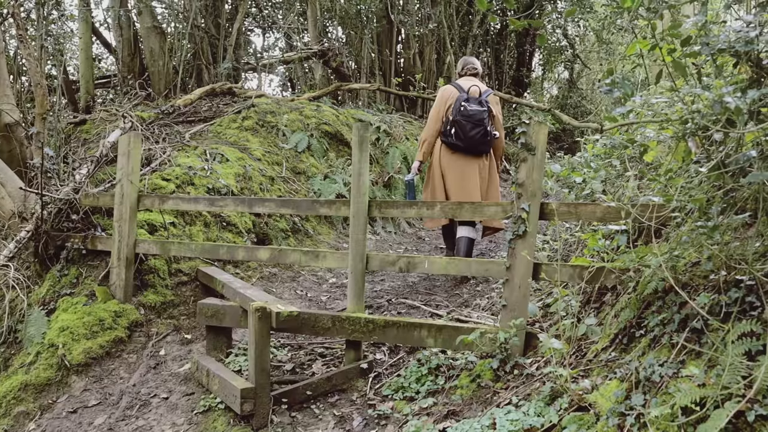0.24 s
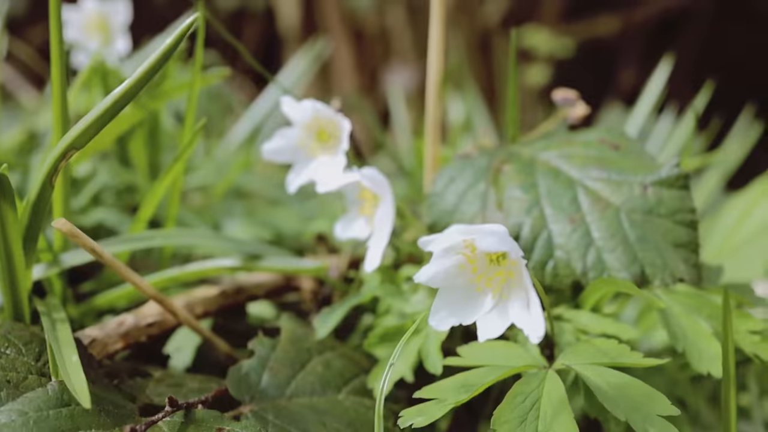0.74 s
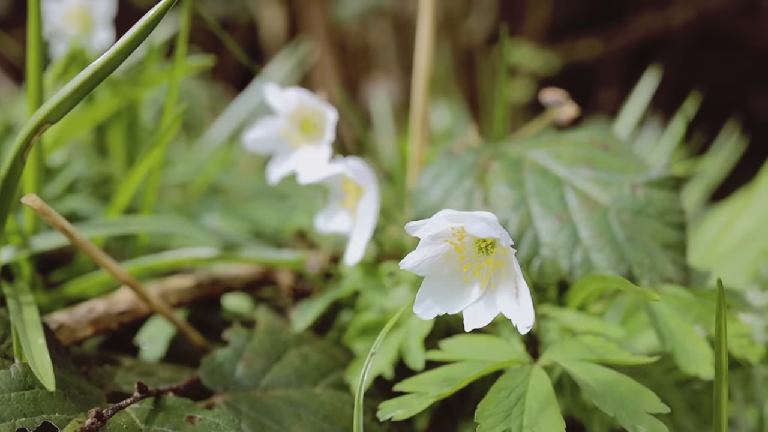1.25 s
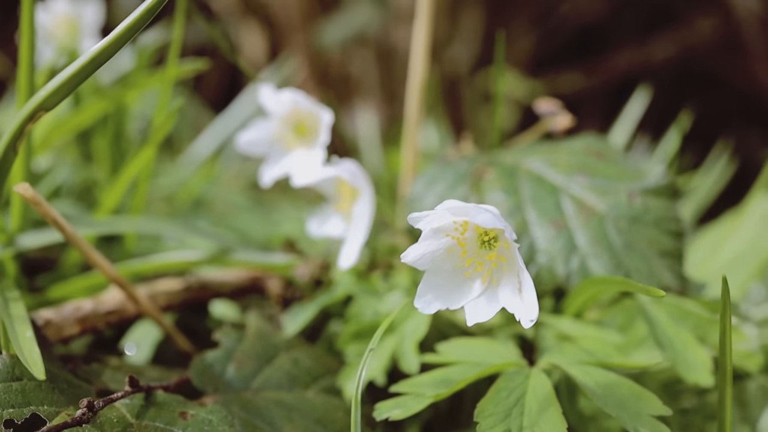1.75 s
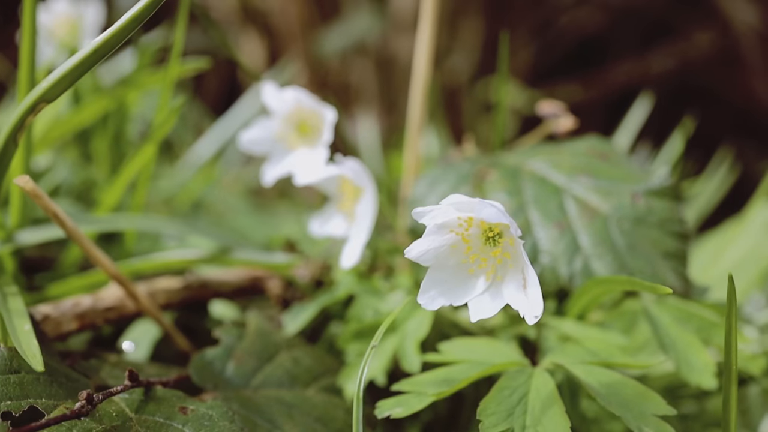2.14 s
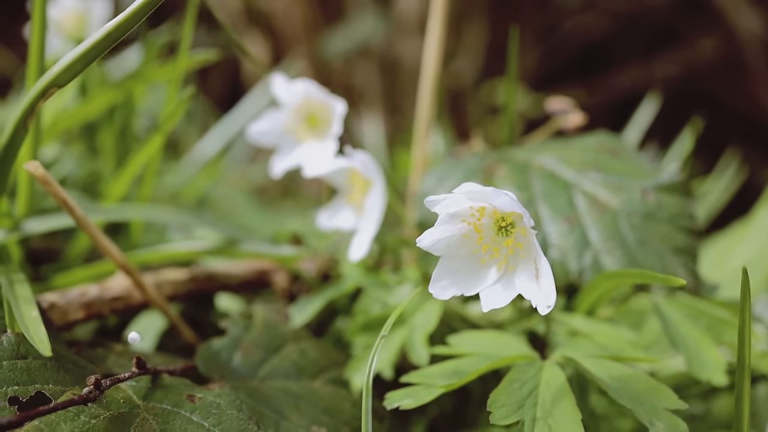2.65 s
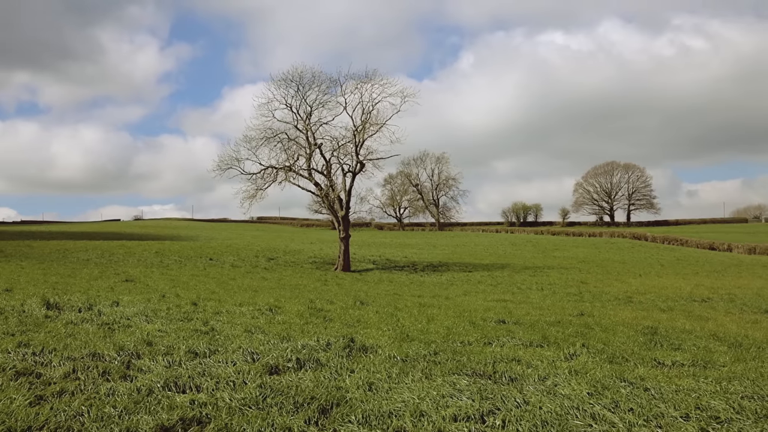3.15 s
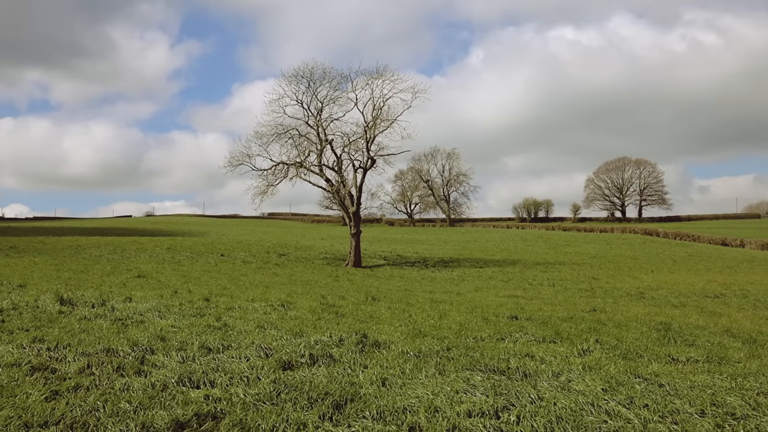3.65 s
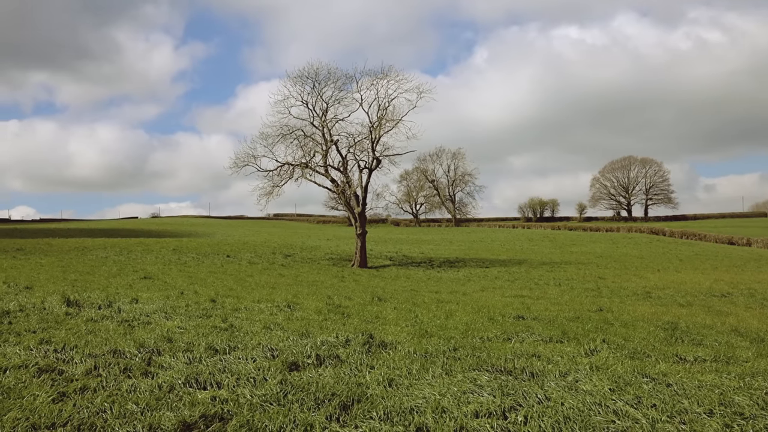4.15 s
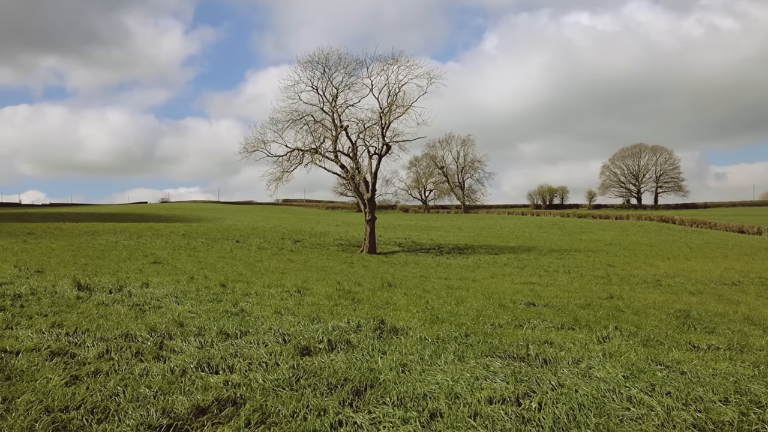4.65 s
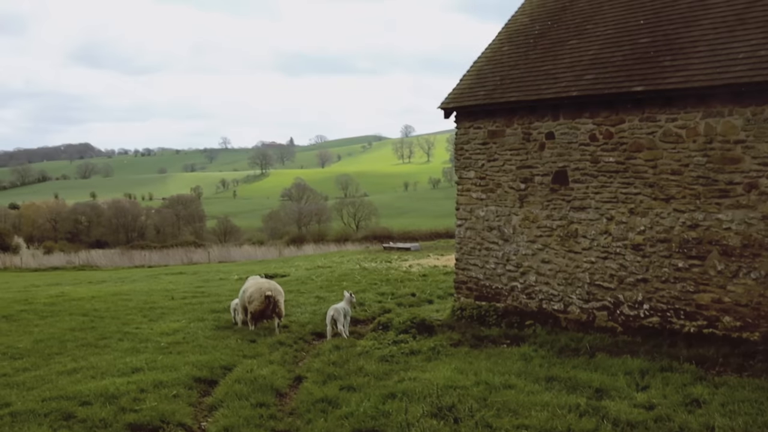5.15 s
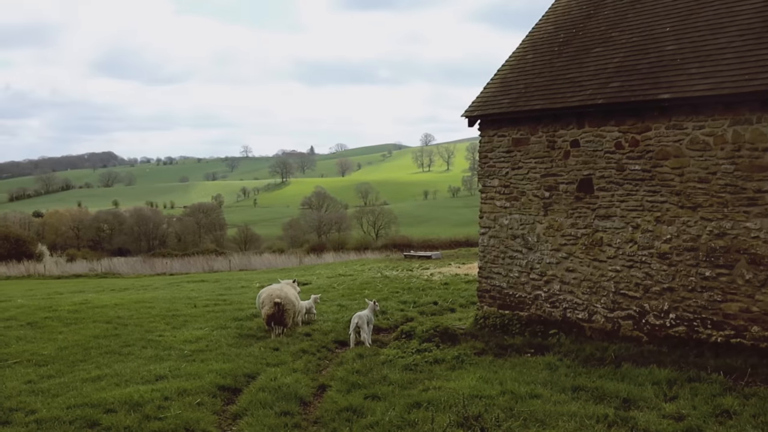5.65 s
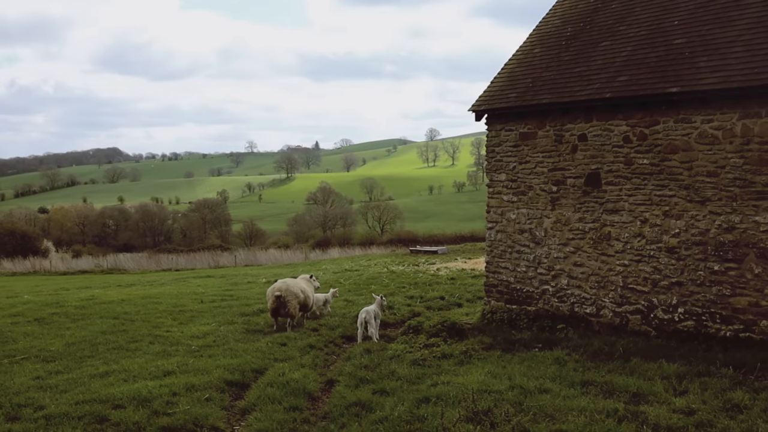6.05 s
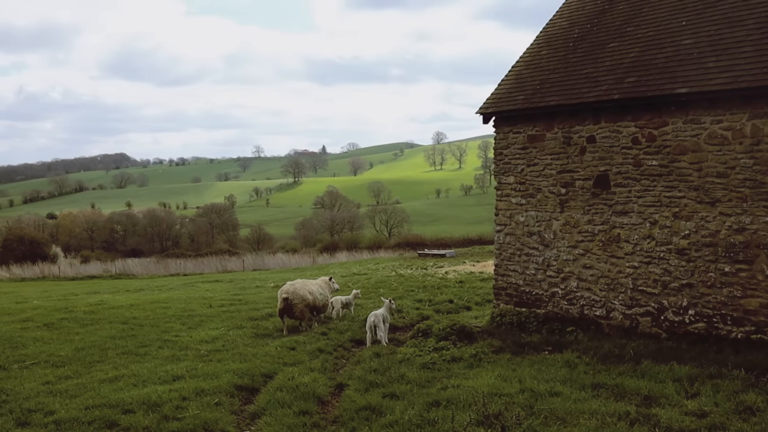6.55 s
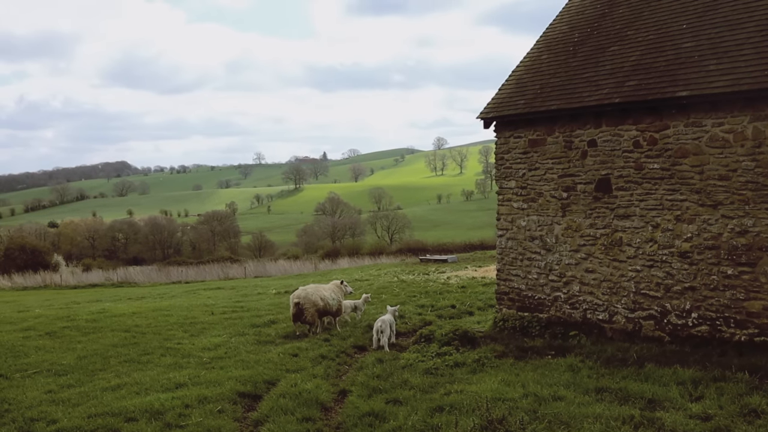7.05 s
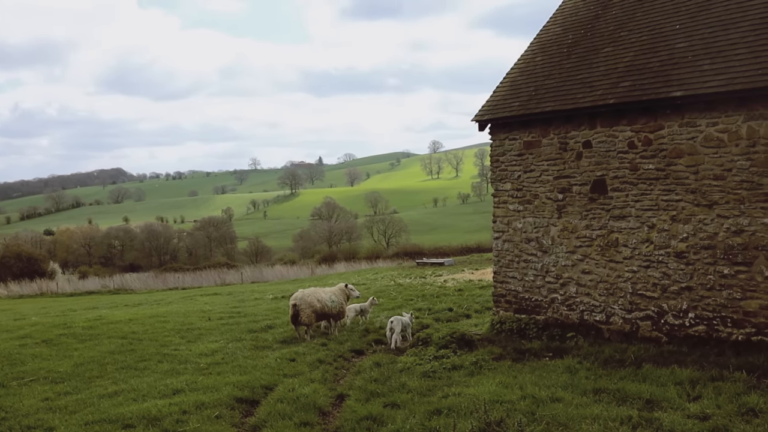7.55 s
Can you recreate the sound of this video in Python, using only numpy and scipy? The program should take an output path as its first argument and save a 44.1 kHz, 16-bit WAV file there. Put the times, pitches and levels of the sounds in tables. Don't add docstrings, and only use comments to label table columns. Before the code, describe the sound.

A wren sings thin, bright notes and a quick repeating trill over gritty footsteps and twig snaps in a reverberant wood. It cuts to a bubbling brook with sharp drop ticks and a short finch wheeze, then to wind rubbing grass in an open field. Finally a lamb bleats shakily, a ewe grumbles low, faint birds chirp, hooves thud, and a second lamb bleats until the end. Low wind thuds on the microphone throughout.

```python
import sys
import numpy as np
from scipy import signal
from scipy.io import wavfile
from scipy.ndimage import uniform_filter1d

SR = 44100
rng = np.random.default_rng(int(sys.argv[2]) if len(sys.argv) > 2 else 0)


def gain_from_db(level_db):
    decades = np.asarray(level_db, float) / 20
    return 10 ** decades


def bounce(signal):
    frames = np.transpose(np.atleast_2d(signal))
    limited = np.clip(frames, -1, 1)
    pcm = np.round(limited * 32767).astype(np.int16)
    wavfile.write(sys.argv[1], SR, pcm)


N = 344421


def evened(x):
    return x / np.sqrt(np.mean(x ** 2) + 1e-20)


def curve(rows, t):
    s, *columns = np.transpose(rows)
    return [np.interp(t, s, c) for c in columns]


def add(mix, s, sound):
    part = mix[round(s * SR):][:len(sound)]
    part += sound[:len(part)]


def resonate(x, hz, width):
    turn = np.exp(2j * np.pi * np.cumsum(hz * np.ones(len(x))) / SR)
    r = np.exp(-np.pi * width / SR)
    return 2 * (turn * signal.lfilter([(1 - r) ** 2], [1, -2 * r, r * r], x / turn)).real


def colour(x, points, patchy_db=0.):
    hz, _, z = signal.stft(x, SR, nperseg=512, noverlap=384)
    blotches = uniform_filter1d(rng.standard_normal(z.shape), size=5, axis=0)
    blotches = evened(uniform_filter1d(blotches, size=16, axis=1))
    f, db = np.transpose(points)
    spectrum_db = np.interp(np.log(hz + 1), np.log(f + 1), db)[:, None]
    z = z * gain_from_db(spectrum_db + patchy_db * blotches)
    return evened(signal.istft(z, SR, nperseg=512, noverlap=384)[1][:len(x)])


def grains(count, per_s, spread_db):
    sizes = gain_from_db(spread_db * np.minimum(rng.exponential(1, count), 4)) * rng.standard_normal(count)
    return evened(sizes * (rng.random(count) < per_s / SR))


def echoes(x, t60, wet_db, gap):
    t = np.arange(SR // 2) / SR
    hits = rng.standard_normal(len(t)) * (rng.random(len(t)) < 2000 / SR)
    tail = hits * gain_from_db(-60 * t / t60) * (t > gap)
    return x + gain_from_db(wet_db) * signal.oaconvolve(x, tail / np.linalg.norm(tail))[:len(x)]


def rings(events, cycles, glide):
    out = np.zeros(N)
    for s, db, hz in events:
        turns = np.arange(int(5 * cycles * SR / hz)) * hz / SR
        tone = np.sin(2 * np.pi * turns * (1 + glide * turns / cycles))
        add(out, s, gain_from_db(db) * tone * np.exp(-turns / cycles) * np.minimum(turns, 1))
    return out


def whistles(notes):
    out = np.zeros(N)
    for start, end, first, middle, last, db in notes:
        u = np.linspace(-1, 1, int((end - start) * SR))
        hz = middle + (last - first) / 2 * u + ((first + last) / 2 - middle) * u ** 2
        swell = np.sqrt(2) * (1 - u ** 2) ** 0.87
        add(out, start, gain_from_db(db) * np.sin(2 * np.pi * np.cumsum(hz) / SR) * swell)
    return out


# pitch_hz, density_db
AIRS = [
    [(71, -39), (120, -2), (922, -8.5), (2890, -15.5), (4090, -8), (4530, -12.5), (5440, -8.5), (6800, -20),
     (15700, -25.5)],
    [(71, -40), (120, -20), (192, 2), (589, -5), (652, -7), (867, -3), (1230, -3.5), (1740, -2), (5440, -9),
     (14200, -23.5), (15700, -24)],
    [(71, -11), (120, 3.5), (260, 0), (368, -5.5), (652, -4.5), (1230, -7), (1540, -8), (2130, -14),
     (2720, -14), (15700, -37.5)],
    [(71, -14), (120, -0.5), (245, -8), (425, -14.5), (532, -19), (722, -16), (800, -18.5), (1180, -19),
     (4710, -26), (15700, -33)],
]
# hiss level_db in a mean wind, blotchiness_db, drift_db_per_s
AIR_LEVEL_DB = [-48.5, -46.5, -50, -53]
PATCHY_DB = [1.1, 1.8, 0.94, 1.5]
AIR_DRIFT = [4, -0.1, -0.5, -1.1]
# time_s, level_db
WIND = [(0, -53), (.54, -54.5), (.6, -39.5), (1.78, -45), (2.15, -41), (2.68, -50), (2.8, -37),
        (3.2, -42.5), (3.31, -36), (4.18, -41.5), (4.3, -31.5), (4.62, -41), (4.76, -29.5), (4.97, -31),
        (5.02, -49), (5.33, -36), (5.48, -42), (7.81, -46)]
MEAN_WIND_DB = -44
# quick buffeting level_db in a mean wind, then rise of buffeting and of hiss in db_per_db of wind
BUFFET_DB = [-58, -58.5, -50.5, -62]
BUFFET_FOLLOWS = [.05, 0.077, 0.2, .05]
AIR_FOLLOWS = [0.041, 0.011, .05, 0.3]
# centre_s, width_s, hiss_db, buffet_db
SWELLS = [
    (1.62, 0.35, -2, 3.5),
    (3.35, 0.22, 4, -2),
    (4.53, 0.325, 4.5, 4),
    (4.95, 0.15, 1, 12),
]


def air(place, t):
    push_db = curve(WIND, t)[0]
    above_db = push_db - MEAN_WIND_DB
    heave = evened(resonate(rng.standard_normal(len(t)), 25.9, 13.2))
    buffet = evened(resonate(rng.standard_normal(len(t)), 77.0, 58))
    hiss = colour(rng.standard_normal(len(t)), AIRS[place], PATCHY_DB[place])
    slow_db = uniform_filter1d(above_db, size=9000)
    hiss_db = AIR_LEVEL_DB[place] + AIR_FOLLOWS[place] * slow_db + AIR_DRIFT[place] * (t - t.mean())
    swell_db, blast_db = sum(np.outer(dbs, np.exp(-((t - s) / width) ** 2)) for s, width, *dbs in SWELLS)
    buffet_db = BUFFET_DB[place] + BUFFET_FOLLOWS[place] * above_db + blast_db
    return gain_from_db(hiss_db + swell_db) * hiss + gain_from_db(push_db - 1.5) * heave + gain_from_db(buffet_db) * buffet


# pitch_hz, density_db
GRASS = [(880, -17), (1500, -7), (2870, -8.5), (3390, -8), (6610, -12.5), (8450, -12), (12300, -14.5),
         (15700, -16.5)]
# stir_s, strike_s, full_s, drop_s
GUST_S = (4.05, 4.39, 4.446, 4.71)
GUST_DB = -42.5
STIR_DB, BUILD_DB, SAG_DB, AFTER_DB = -10, -6, -5, -8


def gust():
    t = np.arange(N) / SR
    drop = GUST_S[-1]
    swell_db = np.where(t < drop, np.interp(t, GUST_S, [STIR_DB, BUILD_DB, 0, SAG_DB]), AFTER_DB)
    rubbing = rng.standard_normal(N) + 0.5 * grains(N, 2500, 3.2)
    return colour(rubbing, GRASS, 1.8) * gain_from_db(GUST_DB + swell_db)


# start_s, level_db, pitch_hz
BUBBLES = [(0.604, -58, 1910), (0.705, -36, 1710), (0.958, -43, 840), (1.199, -44, 1000), (1.269, -45, 980),
           (1.299, -43, 854), (1.419, -44.5, 830), (1.993, -43.5, 860), (2.359, -43, 1020),
           (2.667, -44, 755)]
# start_s, level_db, pitch_hz
TICKS = [(0.8859, -25, 11300), (1.0061, -46, 10600), (1.4815, -13.5, 8650), (1.482, -16.5, 3270),
         (1.4994, -33, 7250), (1.6457, -26, 9260), (1.7814, -18.5, 8800), (1.8786, -21, 6370),
         (1.9485, -24, 11200)]
# start_s, level_db, pitch_hz
KNOCK = [
    (1.484, -30.5, 62.6),
]


def brook():
    small = sum(resonate(grains(N, 250, 2.5), hz, hz / 9) for hz in np.geomspace(750, 2600, num=7))
    large = rings(BUBBLES, cycles=11.4, glide=0.018)
    ticks = echoes(rings(TICKS, cycles=.6, glide=0.01), .025, 5, .0003)
    return gain_from_db(-79) * evened(small) + large + ticks + rings(KNOCK, cycles=2.8, glide=-.01)


# peak_s, grit_db, sole_db, roll_on_s, roll_off_s
CRUNCH = [
    (.358, -47, -34.5, 0.0067, 0.023),
    (0.372, -44, -55, 0.0082, 0.036),
    (0.459, -53, -48.5, 0.06, 0.024),
    (.477, -35, -35, 0.015, 0.018),
    (.522, -48, -45.5, 0.055, 0.039),
]
# pitch_hz, density_db
GRIT = [(880, -49), (1500, -14), (2680, -8.5), (3200, -8), (3890, -8.5), (6880, -11.5), (8370, -17),
        (9510, -11), (15700, -24)]
# start_s, level_db, pitch_hz
SNAPS = [(0.0322, -22, 3630), (0.3551, -25, 3260), (0.3624, -35, 1140), (0.3714, -37, 3690),
         (0.3834, -29, 1830), (0.4513, -30, 2300), (0.477, -22, 3960), (0.517, -18.5, 4020),
         (0.5374, -27, 3030)]
EDGE_DB = -18.5


def boots():
    out = rings(SNAPS, cycles=2.3, glide=-0.0062)
    t = np.arange(-SR // 10, SR // 10) / SR
    for s, grit_db, sole_db, on, off in CRUNCH:
        weight = gain_from_db(EDGE_DB * np.where(t < 0, -t / on, t / off))
        grit = colour(grains(len(t), 9000, 2.4), GRIT) * gain_from_db(grit_db + 6.5)
        sole = evened(resonate(grains(len(t), 2000, 2.6), 280, 1150)) * gain_from_db(sole_db)
        add(out, s + t[0], (grit + sole) * weight)
    return echoes(out, 0.13, -7.0, .002)


# start_s, length_s, middle_hz, level_db
RISING = [(6.235, 0.0197, 4600, -55.5), (6.355, 0.014, 3150, -65), (6.383, 0.023, 4000, -55.5),
          (6.523, 0.02, 4500, -57), (6.665, 0.008, 3300, -51), (6.698, .018, 3950, -57),
          (6.775, .015, 4000, -63), (6.812, .014, 5200, -69)]
FALLING = [
    (6.914, 0.022, 3160, -57),
    (6.963, 0.023, 3140, -56),
    (7.013, 0.021, 3160, -58),
    (7.064, 0.018, 3200, -54.5),
]
RISE_HZ_PER_S, FALL_HZ_PER_S = 34000, -45000


def chirps():
    notes = []
    for rows, speed_hz in [(RISING, RISE_HZ_PER_S), (FALLING, FALL_HZ_PER_S)]:
        for s, length, hz, db in rows:
            bend = speed_hz * length / 2
            notes.append((s, s + length, hz - bend, hz, hz + bend, db))
    return whistles(notes)


# start_s, end_s
BUZZ_S = (2.54, 2.749)
# low_hz, high_hz
BUZZ_HZ = (3760, 4074)
# start_db, end_db
BUZZ_DB = (-59, -43)
# flutter_multiple, level_db
SIDES = [
    (1, -10),
    (-1, -13),
    (-2, -7),
]
BUZZ_JUMP_S, FLUTTER_HZ = 2.6, 181
THROB_S, THROB_TOP_S, THROB_DB = .062, 2.688, 4.5


def finch():
    t = np.arange(*BUZZ_S, 1 / SR)
    db = np.interp(t, BUZZ_S, BUZZ_DB) + THROB_DB * np.cos(2 * np.pi * (t - THROB_TOP_S) / THROB_S)
    hz = uniform_filter1d(np.where(t < BUZZ_JUMP_S, *BUZZ_HZ) * 1., size=300)
    wobble = evened(uniform_filter1d(rng.standard_normal((len(t), 2)), size=300, axis=0)).T
    flutter = np.cumsum(FLUTTER_HZ * (1 + .22 * wobble[0])) / SR
    turns = np.cumsum(hz * (1 + .005 * wobble[1])) / SR
    reeds = np.sin(2 * np.pi * turns)
    reeds = reeds + sum(gain_from_db(g) * np.sin(2 * np.pi * (turns + k * flutter)) for k, g in SIDES)
    out = np.zeros(N)
    add(out, t[0], gain_from_db(db) * evened(reeds))
    return echoes(out, .15, -8, .004)


# start_s, first_hz, middle_hz, last_hz, level_db
WREN = [
    (.037, 5970, 5560, 5310, -34),
    (.102, 5350, 5340, 5300, -36),
    (.126, 5300, 5300, 5270, -39),
    (.146, 5440, 5293, 5270, -42),
    (.166, 6090, 6600, 6750, -43),
    (.183, 6580, 5960, 6040, -33),
]
# delay_s, length_s, first_hz, last_hz, level_db
TRILL = [
    (0, .016, 4550, 5470, -29.5),
    (0.015, .012, 5300, 6420, -33),
    (0.042, 0.033, 7860, 6800, -40.5),
]
TRILL_S = [.255, .401, .551]
# start_s, end_s, first_hz, middle_hz, last_hz, level_db
WOOD_CHIRP = (.305, .33, 3120, 3050, 3500, -50)
# pitch_hz, width_hz, level_db
LINGER = [
    (7400, 250, -51),
    (6420, 160, -63),
]
LAST_NOTE_S, LINGER_T60_S = .043, 0.5
TRILL_SAG = 0.95


def wren():
    ends = [row[0] for row in WREN[1:]] + [WREN[-1][0] + LAST_NOTE_S]
    notes = [(s, end, *rest) for (s, *rest), end in zip(WREN, ends)] + [WOOD_CHIRP]
    for s in TRILL_S:
        for delay, length, first, last, db in TRILL:
            start = s + delay
            notes.append((start, start + length, first, TRILL_SAG * (first + last) / 2, last, db))
    t = np.arange(N) / SR
    linger = np.zeros(N)
    for hz, width, db in LINGER:
        linger += gain_from_db(db - 60 * t / LINGER_T60_S) * evened(resonate(rng.standard_normal(N), hz, width))
    return echoes(whistles(notes), 0.54, -7.0, .008) + linger


# start_s, length_s, level_db, pitch_hz, width_hz
GASPS = [
    (5.27, .045, -53.5, 3600, 500),
    (5.331, 0.046, -45.5, 2500, 1100),
]


def gasps():
    out = np.zeros(N)
    for s, length, db, hz, width in GASPS:
        u = np.arange(0, 1, 1 / SR / length)
        puff = evened(resonate(rng.standard_normal(len(u)), hz, width))
        add(out, s, gain_from_db(db) * puff * np.sin(np.pi * u ** 0.89))
    return out


SPREAD = .012


def folds(hz, jitter, breath, count, order=13):
    unsteady = evened(uniform_filter1d(rng.standard_normal(len(hz)), size=130))
    turns = np.cumsum(hz * (1 + jitter * unsteady)) / SR
    pulses = sum(-np.cos(2 * np.pi * k * turns - SPREAD * k * k) / (1 + (k / order) ** 3) for k in range(1, count))
    puffs = (.35 + np.exp(-(turns % 1) / .3)) * signal.lfilter([1, -.45], 1, rng.standard_normal(len(hz)))
    return (1 - breath) * evened(pulses) + breath * evened(puffs), turns


# pitch_hz, width_hz, level_db
EWE_THROAT = [(501.4, 110, -2.2), (1320, 128, -5.5), (2120, 150, 0.5), (2520, 400, -1), (3400, 740, -15)]
# start_s, level_db, deep_db
SOBS = [
    (6.398, -52.5, -18),
    (6.483, -42, -7.5),
    (6.573, -39, -4),
    (6.673, -39, -4),
    (6.767, -42.5, 0.2),
    (6.861, -44.5, -8),
]
SOB_S, SOB_HZ = 0.083, 119.4
DEEP_PEAK, DEEP_RISE, DEEP_FALL, DEEP_HUM = 0.3, .12, 0.16, 0.088


def ewe():
    out = np.zeros(N)
    deep_hz, deep_width = EWE_THROAT[0][:2]
    for s, db, deep_db in SOBS:
        u = np.arange(int((SOB_S + 0.041) * SR)) / SR / SOB_S
        drive = folds(SOB_HZ * (1.04 - .08 * u), .04, .6, count=30)[0]
        boom = np.exp(-((u - DEEP_PEAK) / np.where(u < DEEP_PEAK, DEEP_RISE, DEEP_FALL)) ** 2)
        boom = boom + DEEP_HUM * np.sin(np.pi * u / u[-1])
        tone = np.sin(2 * np.pi * deep_hz * u * (1.02 - 0.024 * u) * SOB_S)
        deep = boom * (tone + 0.25 * evened(resonate(drive, deep_hz, deep_width)))
        swell = np.sqrt(np.sin(np.pi * np.minimum(u, 1) ** 0.39) ** 2) * (1 - 0.19 * u)
        rasp = sum(gain_from_db(g) * resonate(drive * swell, f, w) for f, w, g in EWE_THROAT[1:])
        add(out, s, gain_from_db(db) * (gain_from_db(deep_db) * evened(deep) + gain_from_db(-8.5) * evened(rasp)))
    return out


def wander(count, rows):
    noise = rng.standard_normal((rows, count))
    return evened(uniform_filter1d(uniform_filter1d(noise, size=600, axis=1), size=600, axis=1))


# tense_s, tense_hz, slack_hz
QUIVERS = [
    [(5.35, 324, 312), (5.384, 315, 322), (5.461, 338, 286), (5.533, 355, 303), (5.612, 363, 307),
     (5.69, 362, 304), (5.774, 358, 290), (5.859, 346, 306), (5.908, 336, 334), (5.942, 337, 299),
     (5.995, 328, 309), (6.027, 314, 285), (6.073, 308, 285), (6.112, 289, 270)],
    [(7.148, 332, 300), (7.227, 393, 351), (7.295, 398, 360), (7.368, 389, 361), (7.398, 370, 363),
     (7.438, 381, 375), (7.506, 391, 374), (7.542, 373, 350), (7.612, 388, 356), (7.684, 365, 355),
     (7.722, 374, 374), (7.757, 380, 354), (7.8, 366, 356)],
]
# time_s, effort_db, opening_share, chest_db
MOUTHS = [
    [(5.3, -60, 0.2, -1), (5.362, -43.5, 0, 9), (5.373, -28, 0.53, -23), (5.423, -34.5, 0.75, -14),
     (5.427, -27, 0.52, -27), (5.46, -22, 0.71, -20.5), (5.62, -21, 0.89, -21.5), (5.95, -24.5, 0.84, -20),
     (6.12, -25, 0.97, -13), (6.19, -30, 0.1, 5)],
    [(7.1, -43, 0, 12), (7.15, -34.5, 0.84, 0), (7.19, -24.5, 0.7, -17), (7.23, -19, 0.87, -17),
     (7.42, -19.5, 1, -13), (7.61, -20, 0.97, -13.5), (7.645, -22, 0.52, -31), (7.72, -20.5, 0.67, -24.5),
     (7.9, -20.5, 1, -11)],
]
# pitch_hz, width_hz, level_db, shut_mouth_db, follows_db_per_db of quiver
THROATS = [
    [(1303, 290, 3, -32, 0.44), (1047, 39, -8, -3, -0.4), (2240, 740, -6, -2.5, 0),
     (2980, 240, 2.5, -29, .5), (3960, 750, 2, 1, 0), (4900, 280, 0, -10, -0.3),
     (5400, 3300, -17.5, 13, -0.3), (8530, 430, -9, 6, -0.4), (9400, 480, -10.5, 1, -0.3),
     (10300, 640, -15, 0.1, 0.2), (12000, 2200, -29, 0.1, 0.5), (14600, 500, -39, -3, 1),
     (4000, 125, 0.5, 1, -1.3)],
    [(1186, 118, 1.5, -23, 0.5), (1500, 300, -12.5, -8, -0.5), (2160, 870, -11.5, -2, 0.5),
     (2886, 317, 0.6, 3.5, -0.3), (3784, 650, -2.5, 7.5, -0.04), (4780, 790, -7, -2, -1),
     (5990, 2700, -18.5, 4, -0.5), (8300, 900, -16.5, -1, -.6), (9300, 920, -18.5, 1, 0),
     (10240, 940, -17, -3, -1.5), (11700, 1800, -27.5, -5, -2), (14400, 450, -30, -5, -1),
     (15600, 450, -28, -5, -2)],
]
# second chest partial level_db, and its extra db_per_db of quiver
OVERTONE_DB = [-22.5, -15]
OVERTONE_FOLLOWS = [0.65, 2.2]
# loudness following tension in db_per_hz, about mean_hz
DB_PER_HZ = [0.1761, 0.1143]
MEAN_HZ = [333, 369.8]
# time_s, breath_share
BREATH = [
    [(5.3, .7), (5.41, .7), (5.43, .24), (5.9, .24), (6.19, .34)],
    [(7.1, .3), (7.2, .4), (7.3, .38), (7.4, .24), (7.47, .12), (7.6, .2), (7.9, .16)],
]
RAMPS = [
    [(.13, .1, 0), (.3, .52, .1), (.45, .7, .45), (.74, .99, .74), (1, 1, 1)],
    [(.33, .54, .38), (.75, .92, .75), (1, 1, 1)],
]
# time_s, upper_throat_tuning, fill_db between resonances, brightness_db
TONGUES = [
    [(5.3, 0.98, 1, -6), (5.44, 1.013, -1.7, 0.5), (5.55, .99, -1.5, 2), (5.65, 0.97, -1.5, 1.5),
     (5.78, 1.01, 0.5, -0.3), (5.88, 0.96, 0.5, 2.8), (6.0, 0.99, -0.5, 4), (6.1, 1.01, 0.1, -2),
     (6.19, 1.03, 18, -1)],
    [(7.1, 0.97, 2, 3), (7.25, 1.023, -3, 1.5), (7.34, 1.01, -0.5, 2.5), (7.42, 0.986, -1.5, 6),
     (7.485, 1.02, 3.5, -2), (7.52, 1.004, -5, 0), (7.6, 0.98, -0.5, 1), (7.7, 1.035, 1, -1),
     (7.9, 0.99, -5, 2)],
]
PUSH_DB = [
    [.1, .1, .1, .1, .1, .1, .1, .1, .1, .1, .1, .1, .1, .1],
    [.1, .1, .1, .1, .1, .1, .1, .1, .1, .1, .1, .1, .1],
]
# low_hz, high_hz
FILL_HZ = (1400, 2400)
BRIGHT_HZ, LIPS_HZ = 4400, 880
START_HZ, LET_GO_S, SLACK_S = 285, .014, .012
TOP_HZ, TOP_BREATH = 6000, 1.1
TOP_KNEE, TOP_DB = 22, -6
SHUT_TUNING, SHUT_BREATH = 0.8, .62
FRAY, FRAY_DB = .5, 5.5
CATCH = .6
LEAK = .8


def lamb(quivers, mouth, throat, overtone_db, db_per_hz, mean_hz, overtone_follows, breath_rows, ramp, tongue, push_db):
    t = np.arange(mouth[0][0], mouth[-1][0], 1 / SR)
    knots = [(t[0], START_HZ, START_HZ)]
    for tense, top, slack in quivers:
        s, low, _ = knots[-1]
        knots += [(s + a * (tense - s), low + b * (top - low), low + c * (top - low)) for a, b, c in ramp]
        knots += [(tense + LET_GO_S, slack, slack), (tense + LET_GO_S + SLACK_S, slack, slack)]
    hz, force = (uniform_filter1d(c, size=150) for c in curve(knots, t))
    quiver_db = db_per_hz * (force - uniform_filter1d(force, size=3600))

    effort_db, gape, chest_db = curve(mouth, t)
    effort_db = effort_db + db_per_hz * (force - mean_hz) + np.interp(t, [row[0] for row in quivers], push_db)
    shut = 1 - np.clip(gape, 0, 1)
    open_breath = curve(breath_rows, t)[0]
    breath = open_breath + (SHUT_BREATH - open_breath) * shut
    opening = 1 + (SHUT_TUNING - 1) * shut ** 2
    tuning, fill_db, bright_db = curve(tongue, t)

    shake = hz / uniform_filter1d(hz, size=3600)
    speed = np.gradient(hz)
    slipping = np.clip(np.maximum(-speed, CATCH * speed) * SR / 3500, 0, 1)
    slipping = uniform_filter1d(slipping, size=400, origin=199)
    frayed_breath = np.clip(breath + FRAY * slipping + LEAK * np.maximum(1 - shake, 0), 0, 1)
    drive, turns = folds(hz, .0035, frayed_breath, count=44)
    even = gain_from_db(TOP_DB) * folds(hz, .0015, TOP_BREATH * breath + .08, count=44, order=TOP_KNEE)[0]
    low_pass = signal.butter(N=4, Wn=TOP_HZ + 1000, fs=SR, output="sos")
    drive = signal.sosfilt(low_pass, drive * gain_from_db(FRAY_DB * slipping))

    shift, swell = wander(len(t), rows=len(throat)), wander(len(t), rows=len(throat))
    voice = np.zeros(len(t))
    for k, (f, width, db, shut_db, follows) in enumerate(throat):
        tuned_hz = f * opening * (tuning if f > FILL_HZ[1] else 1) * (1 + .012 * shift[k])
        rung = resonate(drive if f < TOP_HZ else even, tuned_hz, width)
        level_db = db + shut_db * shut + follows * quiver_db + 1.88 * min(f / 3000, 1) * swell[k]
        level_db = level_db + fill_db * (FILL_HZ[0] < f < FILL_HZ[1]) + bright_db * (f > BRIGHT_HZ)
        voice += (-1) ** k * gain_from_db(level_db) * rung
    lips = signal.butter(N=7, Wn=LIPS_HZ, btype="high", fs=SR, output="sos")
    voice = signal.sosfilt(lips, voice)
    voice /= np.sqrt(uniform_filter1d(voice ** 2, size=3000) + 1e-12)

    second_db = 0.39 * chest_db + overtone_db + overtone_follows * quiver_db
    chest = gain_from_db(chest_db) * np.sin(2 * np.pi * turns) + gain_from_db(second_db) * np.sin(4 * np.pi * turns)
    fade = np.clip((t[-1] - t) / 0.085, 0, 1) ** 1.26 * np.clip((t - t[0]) / 0.037, 0, 1)
    return t[0], gain_from_db(effort_db) * (voice + chest) * fade


# start_s, level_db, pitch_hz
STONE = [
    (6.671, -35, 8500),
]
# start_s, level_db, pitch_hz
STAMPS = [
    (5.109, -49, 138),
    (5.579, -38.5, 146),
    (6.399, -40, 143),
    (6.459, -38.5, 187),
    (6.902, -36, 179),
]


def barn():
    flock = ewe() + gasps()
    for parts in zip(QUIVERS, MOUTHS, THROATS, OVERTONE_DB, DB_PER_HZ, MEAN_HZ, OVERTONE_FOLLOWS,
                     BREATH, RAMPS, TONGUES, PUSH_DB):
        add(flock, *lamb(*parts))
    flock = echoes(flock, .03, -14, .001)
    flock = echoes(flock, .16, -19, .01)
    birds = echoes(chirps(), 0.26, -9, 0.015)
    pebble = echoes(rings(STONE, cycles=0.65, glide=.01), .03, 4, .0003)
    hooves = rings(STAMPS, cycles=4.0, glide=-0.0099)
    return gain_from_db(0.28) * flock + birds + pebble + hooves


CUTS = [0, .5645, 2.75, 4.983, 7.82]


def scene():
    places = [wren() + boots(), brook() + finch(), gust(), barn()]
    edges = [min(round(s * SR), N) for s in CUTS]
    out = np.zeros(N)
    for k, sound in enumerate(places):
        part = slice(edges[k], edges[k + 1])
        out[part] = sound[part] + air(k, np.arange(N)[part] / SR)
    return out[None]


def band_limit(x):
    return signal.sosfilt(signal.butter(12, 15730, fs=SR, output="sos"), x)


def record(dry):
    return band_limit(dry)


dry = scene()
out = record(dry)
bounce(out)
```